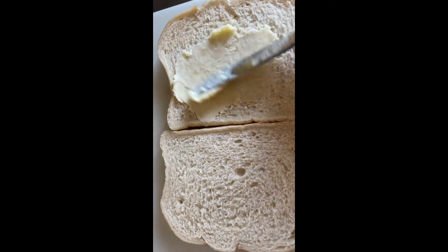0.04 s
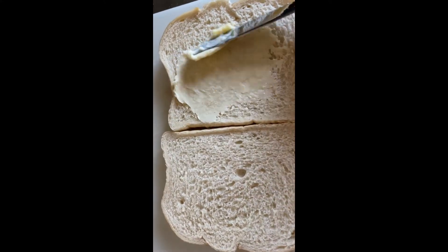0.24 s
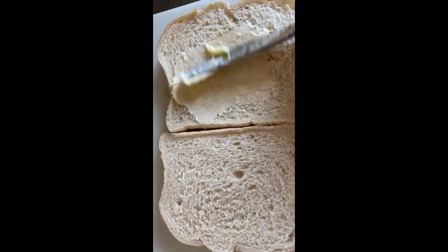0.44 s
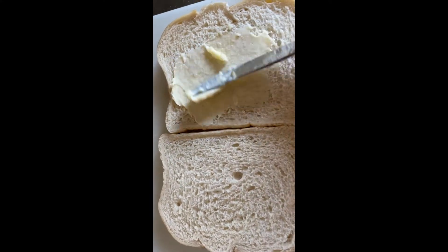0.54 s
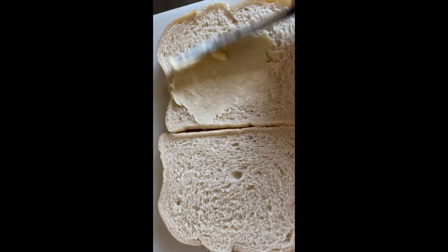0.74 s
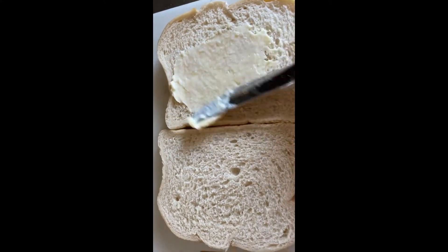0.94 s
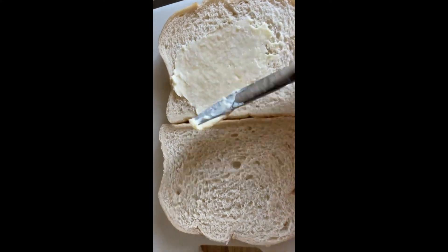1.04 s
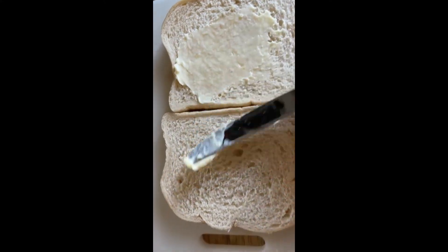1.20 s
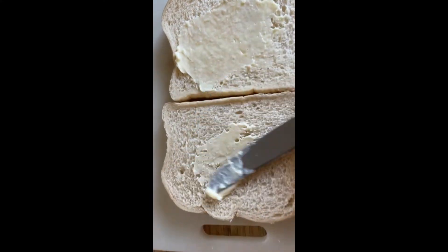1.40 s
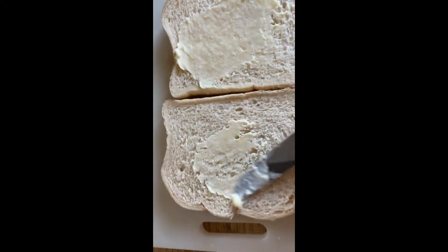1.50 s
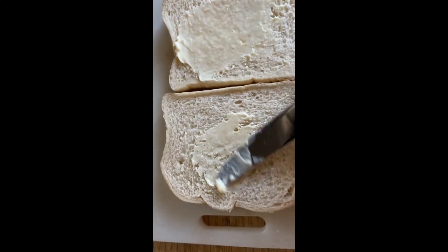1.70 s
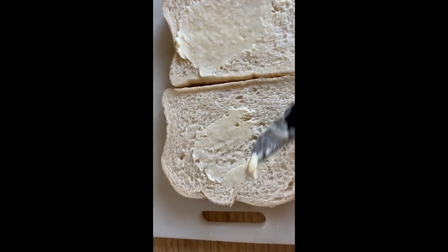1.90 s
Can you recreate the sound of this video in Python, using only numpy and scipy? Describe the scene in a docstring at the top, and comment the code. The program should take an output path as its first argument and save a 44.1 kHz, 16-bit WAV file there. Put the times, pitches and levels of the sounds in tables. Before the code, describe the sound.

A knife butters soft bread, close up in a quiet kitchen. A fizzy, raspy scrape is already under way and fades before a sharp board knock at 0.25 s. Further strokes rasp around 0.4, 0.8 to 0.95, 1.2 to 1.5 and 1.85 s, with tiny sticky snaps, brightest near 0.92. A duller knock lands at 0.77; soft low thuds follow, notably near 0.95 and 1.27. Faint rumble and hiss continue underneath.

```python
"""A knife spreads soft butter over two slices of bread in five quick strokes, close by in a quiet kitchen.
The first stroke is under way at once; as it fades the cutting board tips and knocks on the counter, and
again early in the third. From first to last the blade rasps (noise and grains), the butter crackles (short
bursts) and softer presses make the counter thud (low modes). Rumble, hiss and a faint whine lie beneath."""
import sys
import numpy as np
from scipy import signal
from scipy.fft import rfft, irfft
from scipy.io import wavfile

SR = 44100
rng = np.random.default_rng(int(sys.argv[2]) if len(sys.argv) > 2 else 0)


def pcm_store(signal):
    """Save signal as 16-bit PCM."""
    levels = np.round(np.clip(np.atleast_2d(signal), -1, 1) * 32767)
    wavfile.write(sys.argv[1], SR, levels.astype(np.int16).T)


N = 85995  # samples, just under 2 s
T = np.arange(N) / SR
MONO_HZ = 196  # well below this, left and right are alike
# How long the reflections last in the kitchen. Each row: frequency in Hz, time to fall 60 dB in seconds.
KITCHEN_T60 = [(50, 0.2), (250, 0.62), (600, 0.21), (1200, 0.29), (4000, 0.35), (12000, 0.59)]


def amp(db):
    """Decibels to gain."""
    return 10 ** (np.asarray(db) / 20)


def read(points, hz):
    """A table's value on a log-frequency axis."""
    f, value = np.transpose(points)
    return np.interp(np.log(hz + 1), np.log(f + 1), value)


def unit(x):
    """Scales to rms 1."""
    return x / np.sqrt(np.mean(x ** 2) + 1e-20)


def add(mix, start_s, sound):
    """Mixes a sound in at a time, trimming what falls outside the scene."""
    at = round(start_s * SR)
    sound = sound[..., max(-at, 0):N - at]
    first = max(at, 0)
    mix[:, first:first + sound.shape[-1]] += sound


def colour(x, points):
    """Minimum-phase filter with the given spectrum: it colours a sound without ringing ahead of it."""
    size = 2 ** 17
    hz = abs(np.fft.fftfreq(size, 1 / SR))
    log_gain = np.log(amp(read(points, hz)))
    response = np.exp(np.conj(signal.hilbert(log_gain)))[:size // 2 + 1]
    return irfft(rfft(x, size) * response, size)[..., :x.shape[-1]]


def dull(x, cut_hz):
    """A softer contact loses its treble: second-order low-pass."""
    return signal.lfilter(*signal.butter(2, min(cut_hz, SR / 2 - 1), fs=SR), x)


def spread(pair):
    """A shared signal and a little difference above the bass make left and right."""
    width = 0.17  # share of the difference signal
    bass = signal.lfilter(*signal.butter(1, MONO_HZ, fs=SR), pair[1])
    side = width * (pair[1] - bass)
    return np.array([pair[0] + side, pair[0] - side])


def tail(t60s):
    """Dense reflections as half a second of noise, each band dying at its own speed; left energy is 1."""
    noise = rng.choice([-1., 1.], (2, SR // 2))
    hz, t, bands = signal.stft(noise, SR, nperseg=256)
    decay = amp(-60 * t / read(t60s, hz)[:, None])
    fading = signal.istft(bands * decay, SR, nperseg=256)[1][:, :SR // 2]
    x = spread(fading)
    return x / np.linalg.norm(x[0])


def knife():
    """Each stroke swells, holds and lets go: crumb rasps, butter fizzes and snaps, the slice drags."""
    # Stretches of pressure, some overlapping within one stroke. Each row: full pressure from and until
    # in seconds, rise and release in seconds, rasp, fizz and drag levels in dB, rasp pitch factor.
    strokes = [(0, 0.002, 0.044, 0.11, -65, -53.5, -54, 1.08),
               (0.411, 0.436, 0.16, 0.065, -68, -64.5, -62, 0.91),
               (0.449, 0.462, .06, 0.1, -62, -71, -56.5, 0.69),
               (.737, 0.807, 0.019, 0.061, -71, -63.5, -60, 1.8),
               (0.859, 0.934, 0.11, 0.095, -63.5, -62.5, -58.5, 0.94),
               (1.232, 1.276, 0.24, 0.054, -76.5, -71.5, -77.5, 1.22),
               (1.317, 1.337, 0.067, 0.13, -71, -73, -87, 0.98),
               (1.402, 1.486, 0.16, 0.09, -64, -66.5, -69.5, 1.04),
               (1.832, 1.875, .14, 0.25, -61.5, -73.5, -71, 1.06)]
    # Rasp of blade on crumb, ahead of the pitch factor. Each row: frequency in Hz, level in dB per Hz.
    rasp_shape = [(200, -19.5), (600, -14.5), (1000, 4), (1400, -0.5), (2000, -0.5), (2900, -9.5),
                  (3700, -8.5), (4600, -15), (5800, -12.5), (9000, -11)]
    # Fizz of tearing butter. Each row: frequency in Hz, level in dB per Hz.
    fizz_shape = [(800, -26.5), (2500, -7), (4000, -3.5), (4900, -6.5), (5600, 8.5), (7000, -3.5),
                  (8000, 2), (11000, -2), (13000, -11.5), (16000, -3.5)]
    # Low drag of the slice. Each row: frequency in Hz, level in dB per Hz.
    drag_shape = [(25, -24.5), (52, 5), (90, -6.5), (130, -2.5), (200, -8.5), (350, -11), (500, -15),
                  (900, -11.5), (2000, -42.5)]
    # Butter and crumbs snapping. Each row: start in seconds, level in dB ahead of the fizz colour.
    snap_times = [(0.316, -40.5), (0.363, -40.5), (.390, -49), (.4155, -29), (0.4213, -31), (0.8486, -27),
                  (0.8605, -35), (0.8642, -34), (0.8734, -34), (.8812, -30), (.8832, -39), (0.8997, -34),
                  (0.925, -18), (1.3342, -31.5), (1.465, -38.5), (1.476, -42.5), (1.497, -44.5),
                  (1.863, -36), (1.899, -35.5)]
    slope_db = 35.5  # level gained over a rise and lost over a release
    snap_decay_s, wet_db = 0.0004, -21.5

    out = np.zeros((2, N))
    crumb = grains(spread_db=3.2)
    fizz = unit(colour(grains(spread_db=4), fizz_shape))
    drag = unit(colour(rng.standard_normal(N), drag_shape))
    for start, end, rise, release, rasp_db, fizz_db, drag_db, pitch in strokes:
        before = np.maximum(start - T, 0) / rise
        after = np.maximum(T - end, 0) / release
        pressure = amp(-slope_db * (before + after))
        rasp = unit(colour(crumb, [(hz * pitch, db) for hz, db in rasp_shape]))
        out += pressure * (amp(rasp_db) * rasp + amp(fizz_db) * fizz + amp(drag_db) * drag)

    snaps, t = np.zeros((2, N)), T[:SR // 100]
    for start, db in snap_times:
        burst = rng.choice([-1, 1], len(t)) * np.exp(-t / snap_decay_s)
        add(snaps, start, amp(db) * burst / np.linalg.norm(burst))
    out = out + colour(snaps, fizz_shape)
    reflections = signal.fftconvolve(out, tail(KITCHEN_T60), axes=1)[:, :N]
    return out + amp(wet_db) * reflections


def grains(spread_db):
    """Countless tiny ruptures of uneven size over smooth sliding, bunched as the blade catches."""
    grains_per_s, smooth = 2500, 0.6  # smooth: sliding noise against ruptures of rms 1
    clump_s, clump_db = 0.0068, 3
    happens = rng.random((2, N)) < grains_per_s / SR
    size = amp(spread_db * np.minimum(rng.exponential(1, (2, N)), 5)) * happens
    ruptures = unit(size * rng.choice([-1, 1], (2, N)))
    sliding = smooth * rng.standard_normal((2, N))
    clumps = np.interp(T / clump_s, np.arange(N), rng.standard_normal(N))
    return amp(clump_db * clumps) * spread(ruptures + sliding)


def board():
    """The board slaps the counter and rebounds, or just presses on it."""
    # Knocks. Each row: start in seconds, level in dB, treble cut-off in Hz, rebound after in seconds,
    # rebound level and ring level in dB (the rebound relative to the knock).
    knock_rows = [(0.2461, 3, 6260, .0036, -15, 4), (0.7722, -0.5, 3670, 0.00336, -7, -2.5)]
    # Soft presses of the board on the counter. Each row: start in seconds, level in dB, cut-off in Hz.
    thud_rows = [(-.04, -11.5, 135), (.375, -9.5, 110), (.59, -19, 93), (.72, -23, 90), (0.95, -6, 310),
                 (1.028, -9, 100.8), (1.2667, -3, 376), (1.345, -6, 98), (1.48, -19, 100.4),
                 (1.712, -13.5, 132), (1.79, -14, 76)]
    # Modes of the board. Each row: frequency in Hz, level in dB, time to fall 60 dB in seconds.
    board_modes = [(601.4, -32.5, .08), (853, -29, 0.036), (1105, -21, 0.016), (1324, -26.5, 0.015),
                   (1529, -31, 0.018), (2120, -31, .016), (2277, -33.5, .018), (2733, -27, 0.015),
                   (3082, -29, 0.02), (4450, -28, 0.01), (5190, -45.5, 0.018), (6487, -41.5, 0.011)]
    # Modes of the counter. Each row: frequency in Hz, level in dB, time to fall 60 dB in seconds.
    counter_modes = [(55.4, -37.5, 0.27), (130.8, -53, .25), (146.6, -46, 0.26), (242.5, -51, 0.31),
                     (274.2, -35, .15), (362.8, -46, 0.2), (434, -48, 0.24)]
    # The dull second slap, ahead of its low-pass. Each row: frequency in Hz, level in dB.
    rebound_shape = [(50, -11.5), (300, 11.5), (550, 13), (800, 13.5), (1300, 5.5), (3000, -5.5)]
    # The soft push itself, ahead of its cut-off. Each row: frequency in Hz, level in dB.
    press_shape = [(20, -6.5), (50, 17.5), (100, 5), (200, -0.5), (400, -1.5), (560, 1.5), (750, -15.5),
                   (1500, -31.5), (4000, -63.5)]
    rebound_cut_hz, ring_delay_s = 599.3, 0.0044
    thud_ring_db, thud_boom_db = -4.5, -1.5

    knocks, thuds = np.zeros((2, 2, N))
    clack, boom = modes(board_modes), modes(counter_modes)
    click = signal.unit_impulse(SR // 2)
    push, slap = colour(click, press_shape), colour(click, rebound_shape)
    for start, db, cut_hz, again_s, again_db, ring_db in knock_rows:
        add(knocks, start, amp(db) * (dull(clack, cut_hz) + boom))
        add(knocks, start + again_s, amp(db + again_db) * dull(slap, rebound_cut_hz))
        add(knocks, start + ring_delay_s, amp(ring_db) * dull(ring(), cut_hz))
    for start, db, cut_hz in thud_rows:
        soft_boom = amp(thud_boom_db) * dull(boom, cut_hz / 2)
        soft_ring = amp(thud_ring_db) * dull(ring(), 2 * cut_hz)
        add(thuds, start, amp(db) * dull(push + soft_boom + soft_ring, cut_hz))
    # a soft press sweeps down more slowly
    return disperse(knocks, cycles=1.9, knee_hz=9.2) + disperse(thuds, cycles=3, knee_hz=48.4)


def modes(table):
    """Struck modes as decaying sines; the low ones build most slowly."""
    swell_cycles = 0.18
    t = T[:SR // 2]
    total = np.zeros(len(t))
    for hz, db, t60 in table:
        decay = amp(db - 60 * t / t60)
        swell = 1 - np.exp(-(t * hz / swell_cycles) ** 2)
        total += decay * swell * np.sin(2 * np.pi * hz * t)
    return total


def ring():
    """Quick early reflections in the counter, then the kitchen."""
    # Colour of the dense ring. Each row: frequency in Hz, relative level in dB per Hz.
    ring_shape = [(40, 6.5), (130, -4.5), (260, -9), (550, -1.5), (690, -13.5), (850, -7), (1400, -11),
                  (1900, -20), (3000, -20), (3500, -17), (4300, -26), (5200, -28), (7000, -41),
                  (10000, -42)]
    early_t60, early_db, kitchen_db = 0.18, 1, -1.5  # s, then the balance of the two
    early = amp(early_db) * tail([(50, early_t60), (12000, early_t60)])
    kitchen = amp(kitchen_db) * tail(KITCHEN_T60)
    return 2 * colour(early + kitchen, ring_shape)


def disperse(x, cycles, knee_hz):
    """Bending waves: low notes travel slowly, so each blow sweeps downwards."""
    hz = np.fft.rfftfreq(2 * N, 1 / SR)
    lag = np.exp(-2j * np.pi * cycles * np.log1p(hz / knee_hz))  # delay is cycles / (hz + knee_hz)
    return irfft(rfft(x, 2 * N) * lag)[..., :N]


def room_tone():
    """Low rumble, hiss that differs between the ears, both slowly easing, and a faint electrical whine."""
    # Colour of the quiet kitchen. Each row: frequency in Hz, relative level in dB per Hz.
    quiet_shape = [(20, -14.5), (55, 5), (90, -9.5), (125, -4), (180, -6.5), (260, -18), (360, -14),
                   (470, -26), (1000, -30), (2500, -31), (4500, -32.5), (6500, -34), (11000, -38),
                   (16000, -28.5)]
    start_db, db_per_s = -66.5, -1.5
    diffuse_hz = 870  # shared by both ears below, separate above
    whine_hz, whine_db = 11730, -90
    low = dull(rng.standard_normal(N), diffuse_hz)
    high_pass = signal.butter(2, diffuse_hz, "high", fs=SR)
    high = signal.lfilter(*high_pass, rng.standard_normal((2, N)))
    noise = unit(colour(low + high, quiet_shape))
    whine = amp(whine_db) * np.sin(2 * np.pi * whine_hz * T)
    return amp(start_db + db_per_s * T) * noise + whine


def ports(x, lead, pan):
    """A source reaches the two microphone ports with different phase and level; the bass reaches both alike."""
    hz = np.fft.rfftfreq(2 * N, 1 / SR)
    apart = hz ** 2 / (hz ** 2 + MONO_HZ ** 2)
    gain = amp(apart * read(pan, hz) / 2)
    left, right = rfft(x, 2 * N)
    late = np.exp(-1j * apart * read(lead, hz))
    return irfft(np.array([left * gain, right / gain * late]))[:, :N]


def scene():
    """Knife and board, each from its own place before the microphone, over the quiet kitchen."""
    # Phase lead of the left port, ahead of the bass blend. Each row: frequency in Hz, lead in radians.
    knife_lead, board_lead = [(340, 1.62), (860, 1.3), (2500, -2), (2840, 1.06), (3960, 0.82), (4650, 2),
                              (5170, 5.5), (5680, 2.5), (8270, 10), (11600, 11.5), (12700, 13)], [(60, 0), (430, 0.73), (1290, 0.63), (2760, 0.05),
                                                  (3100, 1.89), (3700, 4), (4220, 7), (5430, 10.5),
                                                  (7410, 15), (8350, 15.6)]
    # Left minus right, ahead of the bass blend. Each row: frequency in Hz, difference in dB.
    knife_pan, board_pan = [(100, 0.056), (640, -1.5), (1170, 1.5), (2100, 1.4), (3800, -0.69), (7000, 0)], [(100, -0.5), (280, -0.5), (650, -4), (1070, 3), (1610, 1),
                                               (2420, -4), (3650, -2), (6000, 0)]
    return ports(knife(), knife_lead, knife_pan) + ports(board(), board_lead, board_pan) + room_tone()


def record(dry):
    """A small microphone with a low cut and a notch in the treble, then the band limit."""
    # Colour of the microphone. Each row: frequency in Hz, gain in dB.
    mic_shape = [(20, -0.5), (7000, 0), (8300, -0.5), (9300, -17.5), (10200, -1), (11300, 6), (12300, -9.5),
                 (13300, -14.5), (15500, -37.5)]
    low_cut_hz, edge_hz = 31.6, 15400
    low_cut = signal.butter(2, low_cut_hz, "high", fs=SR, output="sos")
    x = signal.sosfiltfilt(low_cut, colour(dry, mic_shape))
    band_limit = signal.firwin(511, edge_hz, window=("kaiser", 9), fs=SR)
    return signal.oaconvolve(x, band_limit[None], "same")


dry = scene()
out = record(dry)
pcm_store(out)
```